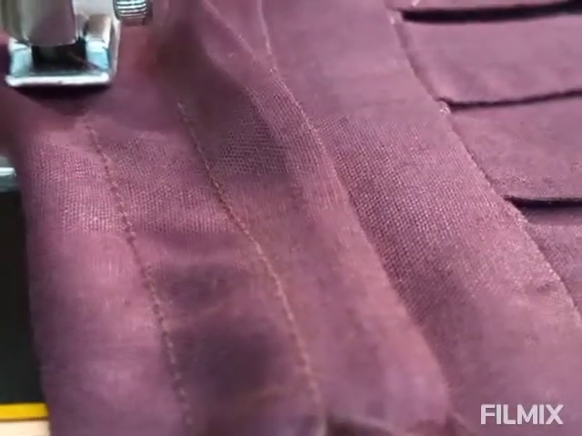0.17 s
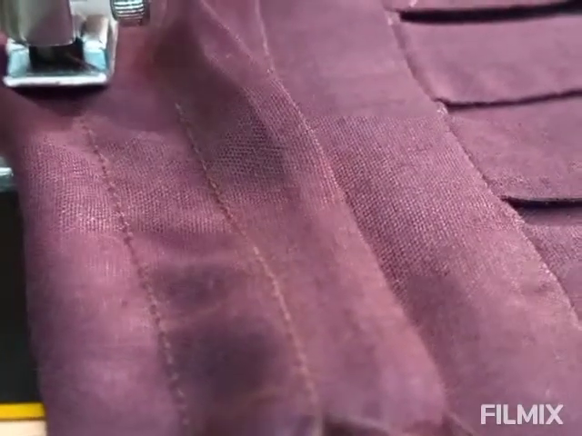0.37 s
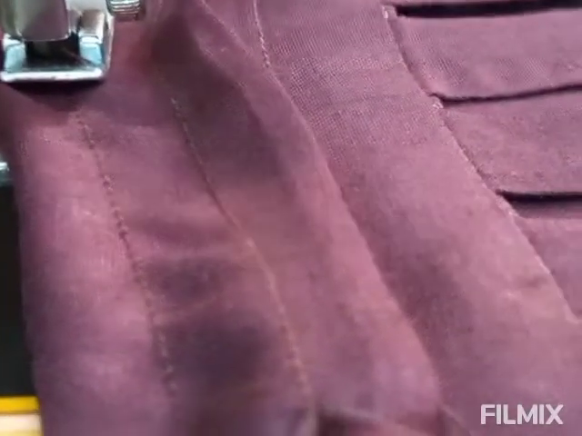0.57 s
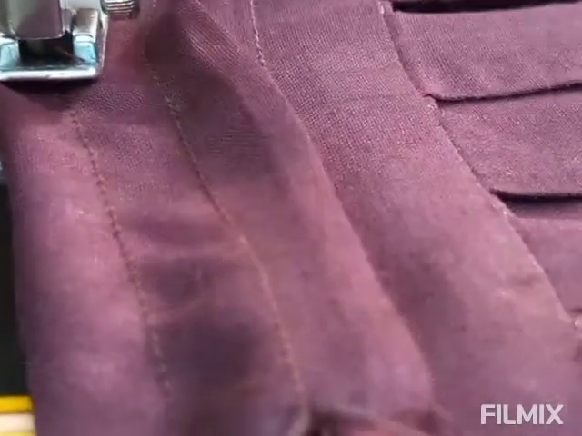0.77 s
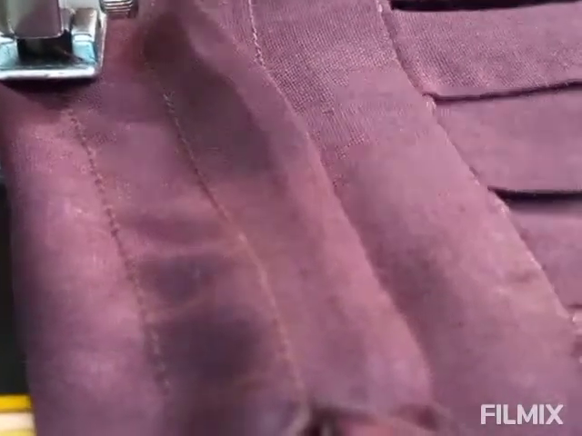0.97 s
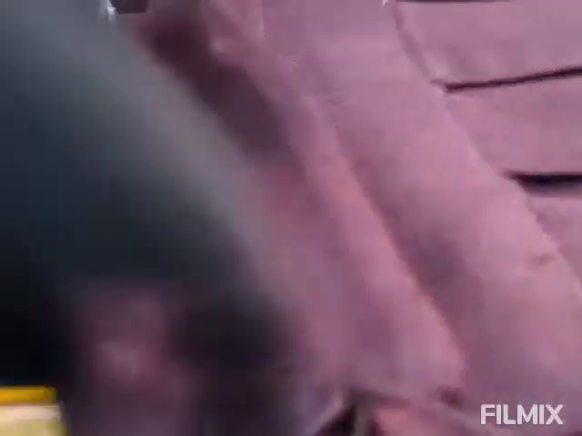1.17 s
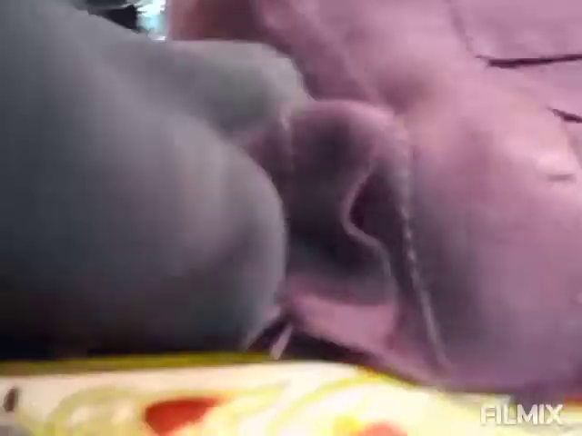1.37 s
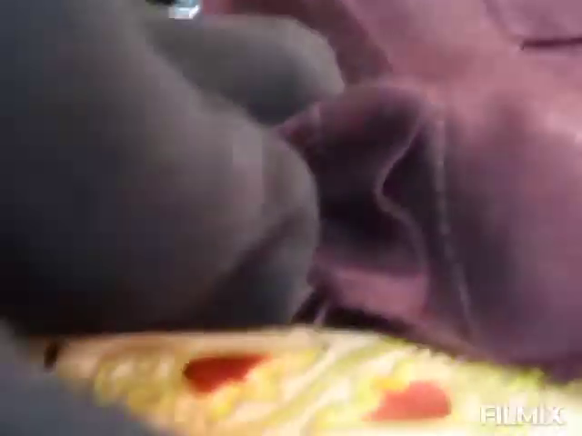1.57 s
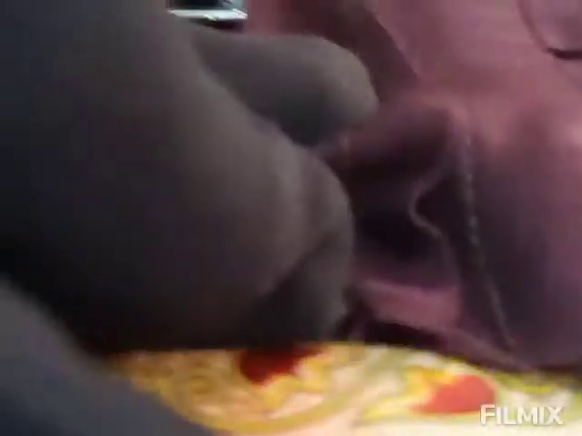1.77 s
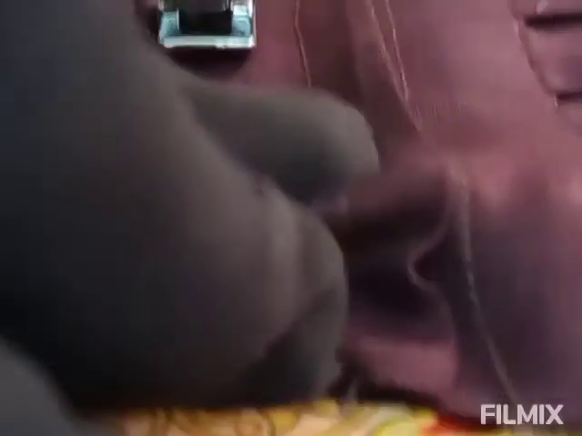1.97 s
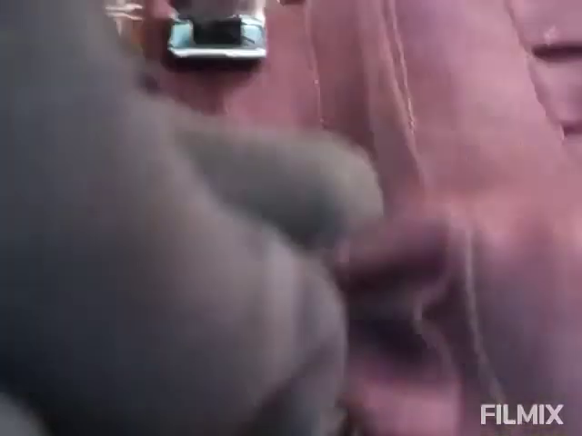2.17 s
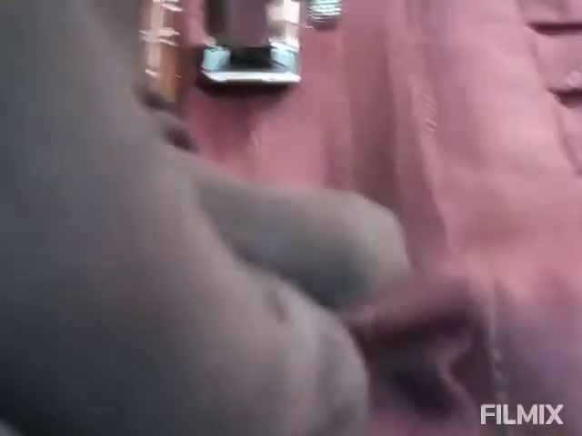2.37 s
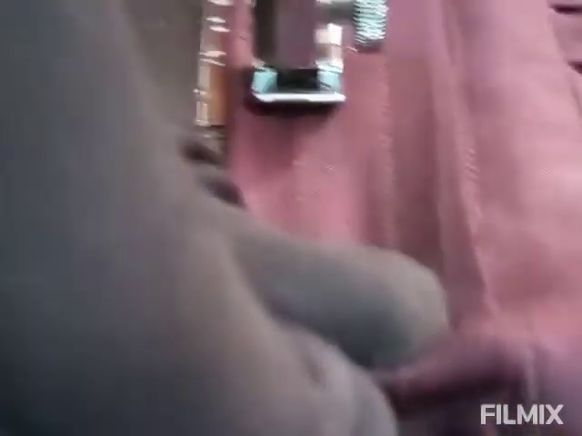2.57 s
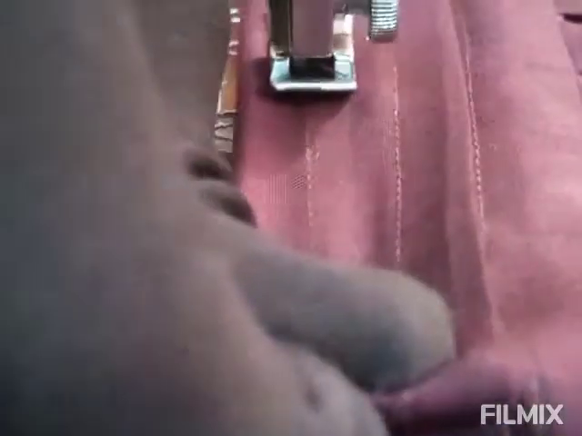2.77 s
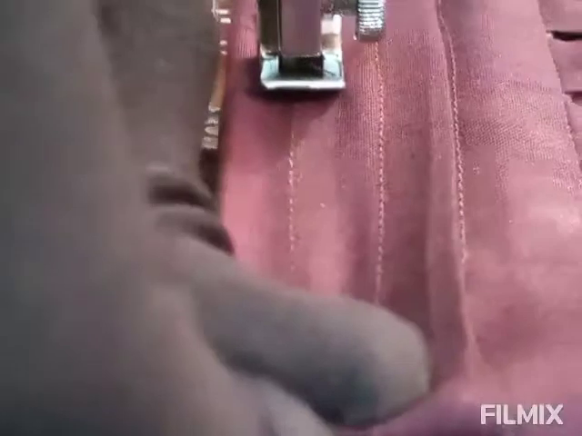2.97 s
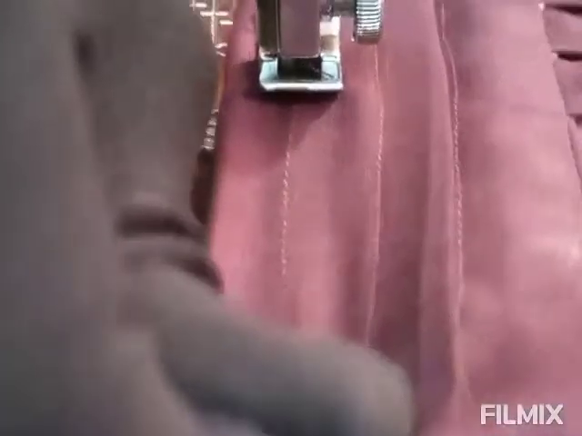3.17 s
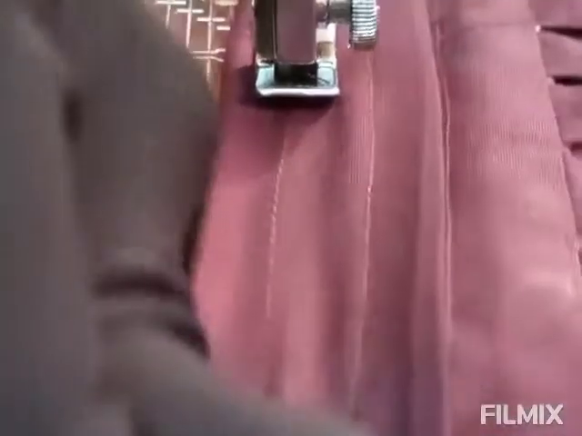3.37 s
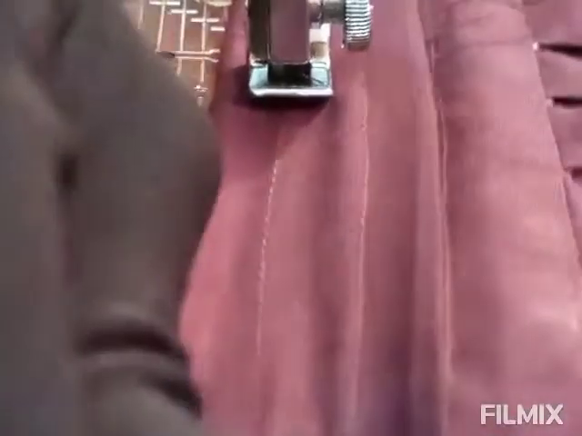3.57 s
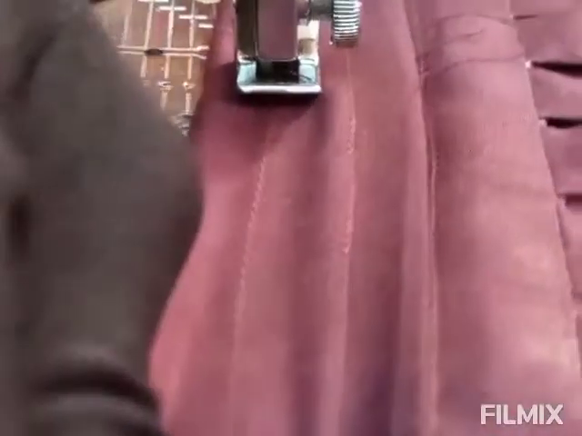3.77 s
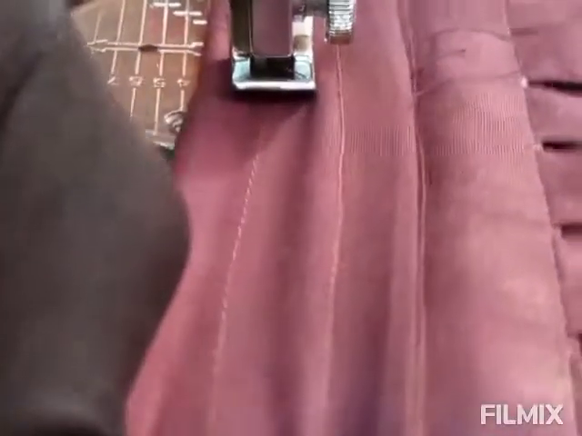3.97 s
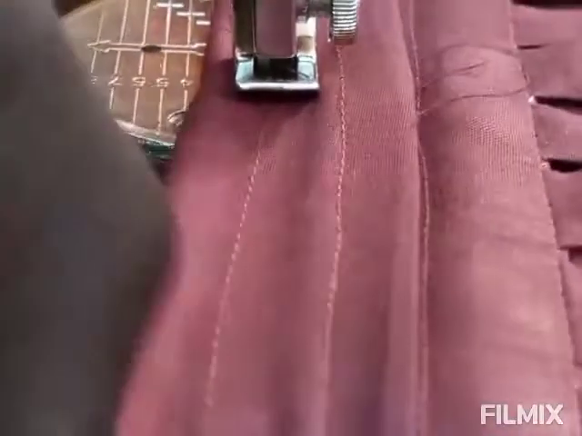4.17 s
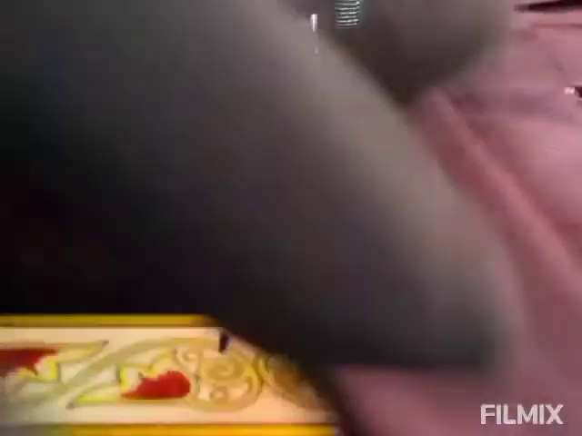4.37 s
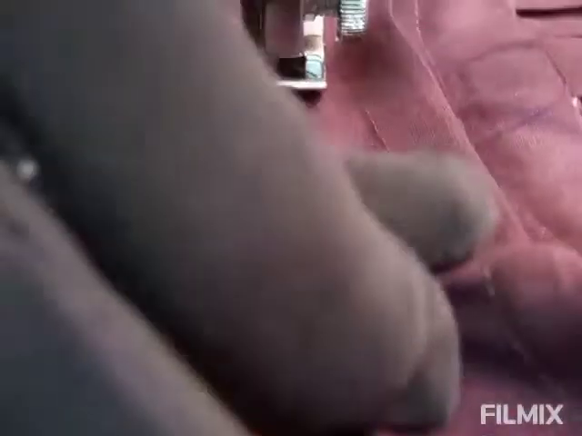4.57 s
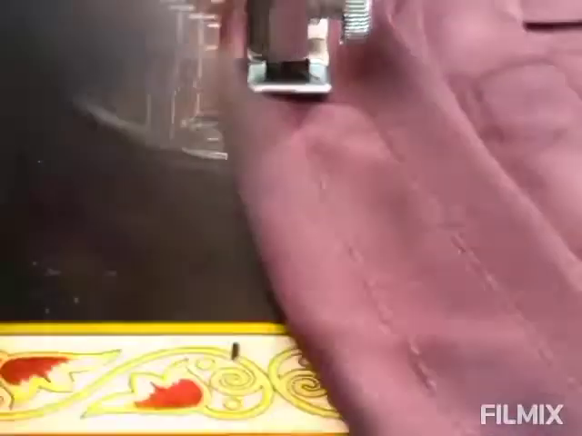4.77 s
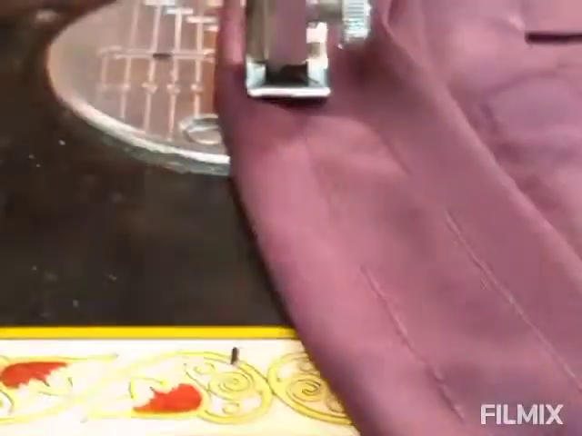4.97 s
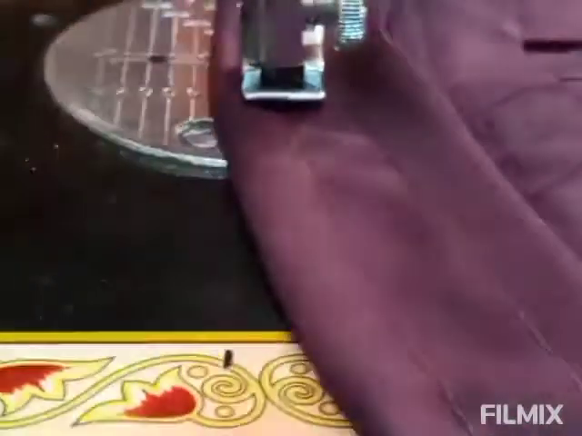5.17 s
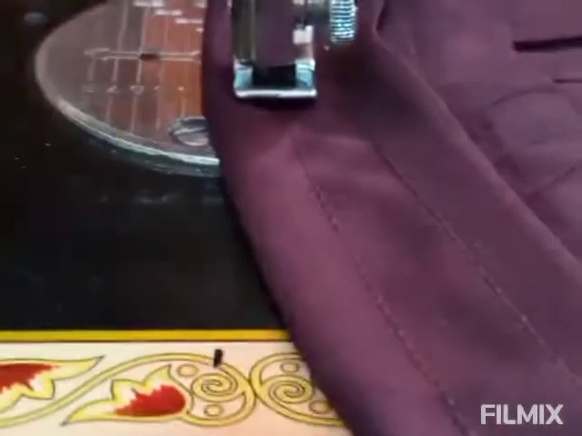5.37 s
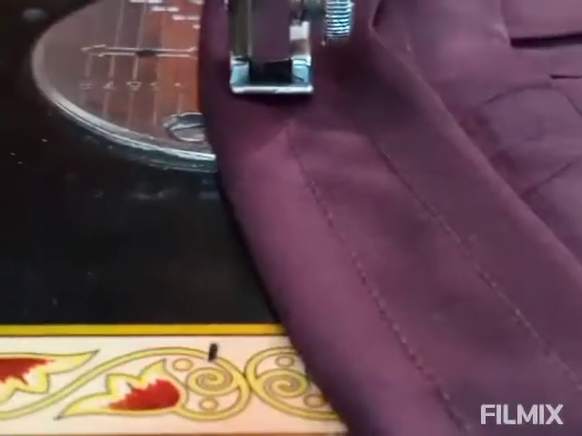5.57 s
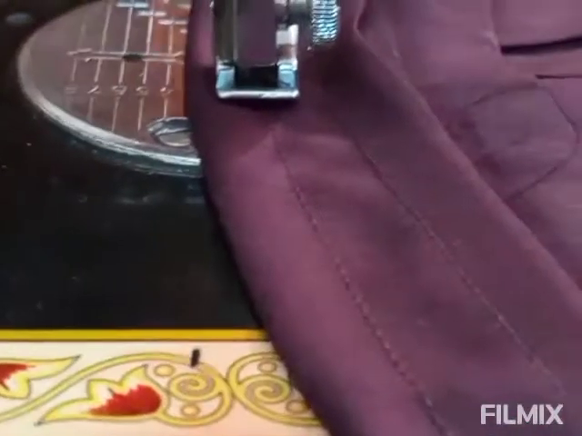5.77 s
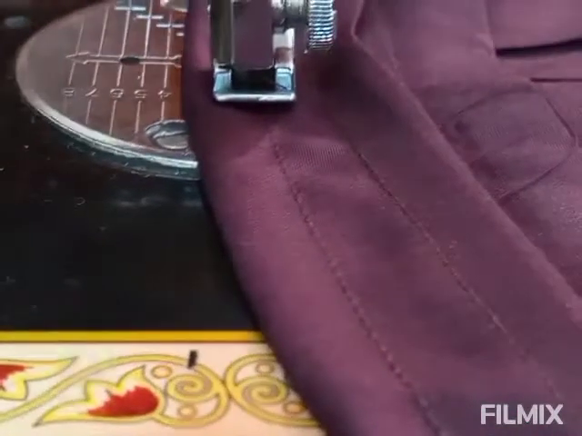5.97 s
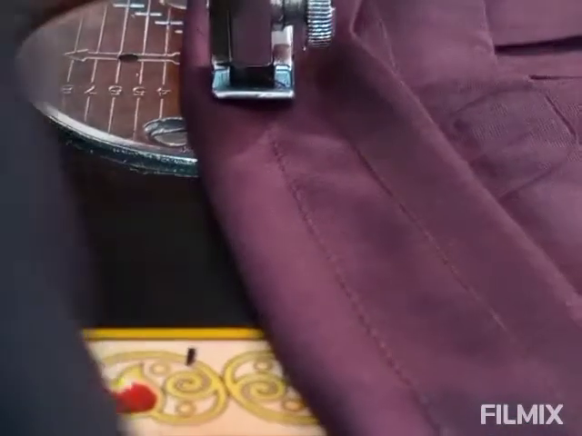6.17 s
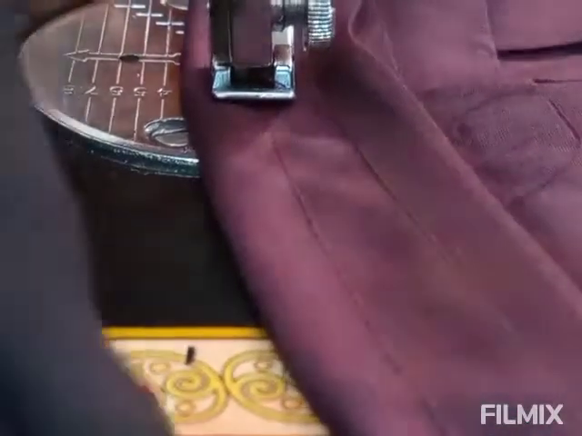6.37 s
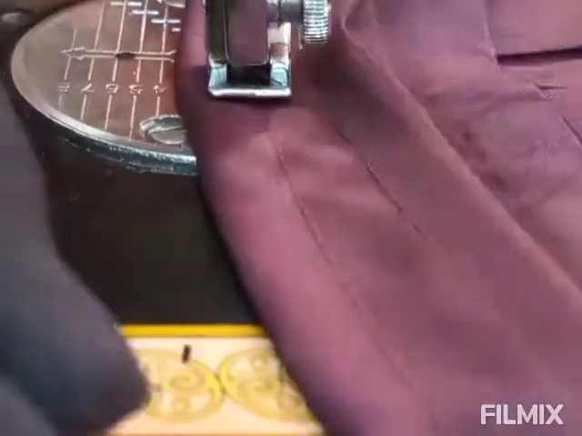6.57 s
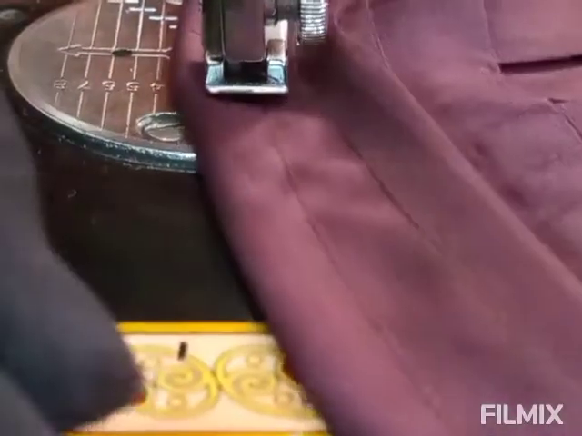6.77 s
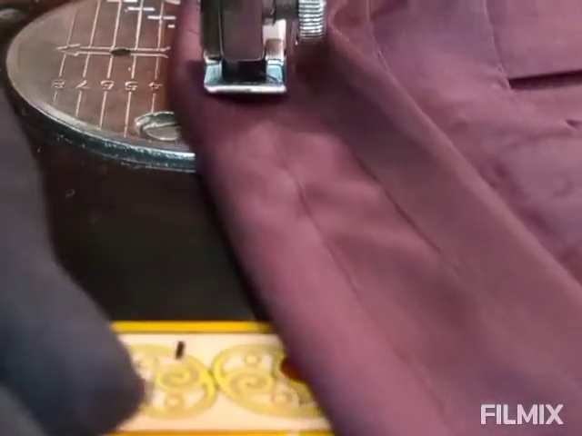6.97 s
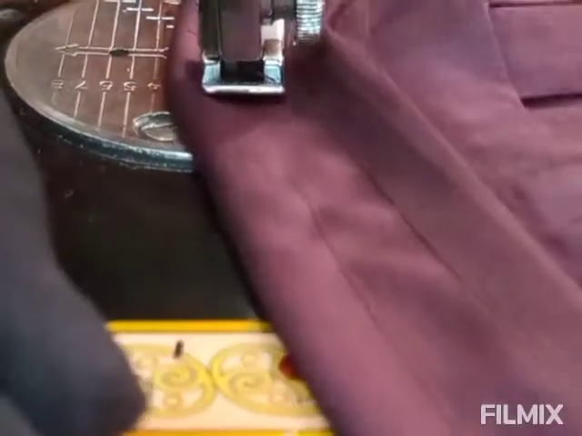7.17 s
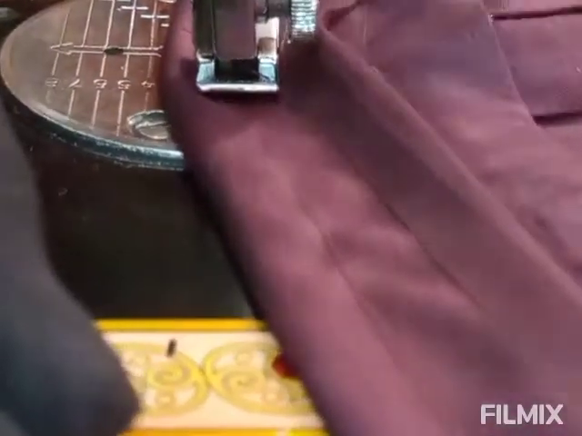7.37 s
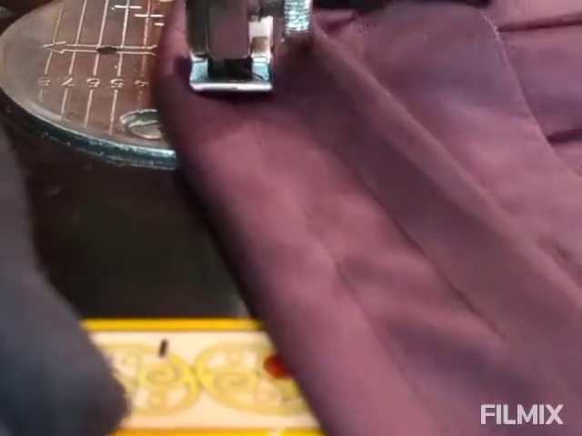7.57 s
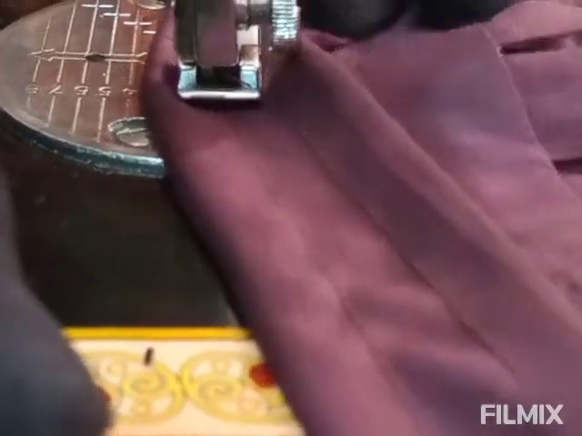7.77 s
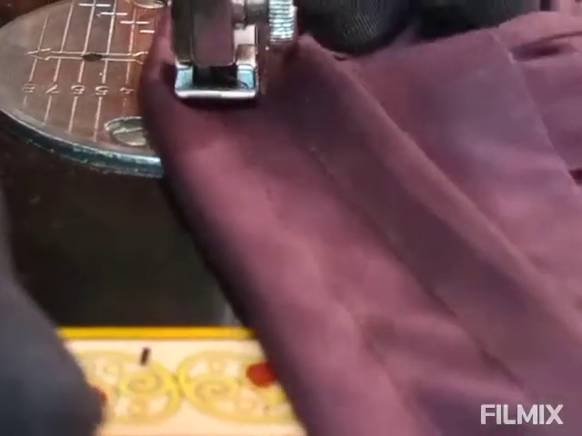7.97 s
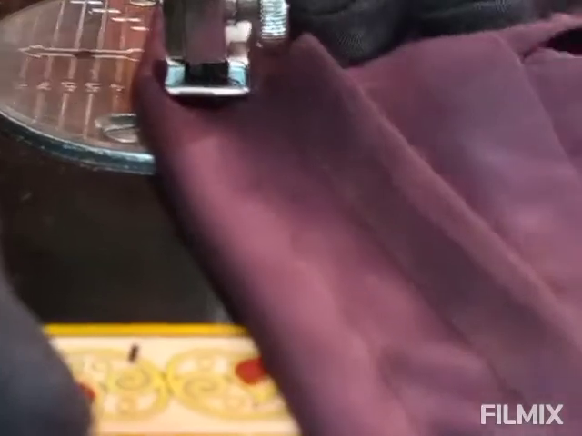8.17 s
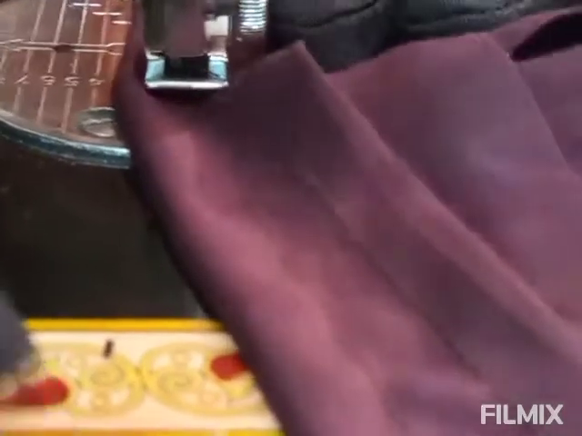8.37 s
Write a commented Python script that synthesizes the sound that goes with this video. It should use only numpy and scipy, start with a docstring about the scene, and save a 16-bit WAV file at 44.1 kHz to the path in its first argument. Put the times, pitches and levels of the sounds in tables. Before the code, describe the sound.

A sewing machine close up: quiet room, then a hissing motor start, a fast metallic clattering run, a slowing stop, and a second fast run.

```python
"""A small room murmurs with steady air noise and a low hum; the microphone stands close to a sewing machine.
The pedal goes down: motor and slipping belt hiss in grains, the drive knocks softly, a rubbing part sings.
A fast run follows: two shuttle swings a stitch, each a dull linkage knock, a light tick and a bright steel
clack of ringing noise, over rattle and table rumble. It slows to a rest with a thin rising whistle, then the
pedal starts a second fast run that lasts to the end."""
import sys
import numpy as np
from scipy import signal
from scipy.io import wavfile
from scipy.ndimage import uniform_filter1d

SR = 44100
rng = np.random.default_rng(int(sys.argv[2]) if len(sys.argv) > 2 else 0)


def write(x):
    x = np.atleast_2d(x).T
    wavfile.write(sys.argv[1], SR, np.round(np.clip(x, -1, 1) * 32767).astype(np.int16))


N = 371322
TIME = np.arange(N) / SR
HZ = np.fft.rfftfreq(8192, 1 / SR)


def amp(db):
    """Decibels to gain."""
    return 10 ** (np.asarray(db) / 20)


def unit(x):
    """Scales to rms 1."""
    return x / np.sqrt(np.mean(x ** 2) + 1e-20)


def read(points, hz):
    """Reads a spectrum on a log-frequency axis."""
    f, value = np.transpose(points)
    return np.interp(np.log(hz + 1), np.log(f + 1), value)


def level(curve):
    """Gain over time from points of (time [s], level [dB]), silent outside them."""
    s, db = np.transpose(curve)
    return np.interp(TIME, s, amp(db), 0, 0)


def ringing(modes):
    """Gain over frequency of a set of resonances, summed in power."""
    power = sum(amp(db) ** 2 / (1 + (2 * (HZ - hz) / width) ** 2) for hz, width, db in modes)
    return np.sqrt(power)


def colour(x, gain):
    """Causal minimum-phase filter of energy 1: resonances ring after each blow."""
    log_gain = np.log(np.maximum(gain / gain.max(), 1e-5))
    circle = np.concatenate([log_gain, log_gain[-2:0:-1]])
    spectrum = np.exp(np.conj(signal.hilbert(circle)))
    response = np.fft.ifft(spectrum).real[:len(HZ)]
    return signal.oaconvolve(x, response / np.linalg.norm(response))[:N]


def grit(per_s, spread_db):
    """Tiny impacts of random size, sign and time, rms 1."""
    size = amp(spread_db * np.minimum(rng.exponential(1, N), 4))
    sign = rng.choice([-1, 1], N)
    struck = rng.random(N) < per_s / SR
    return unit(size * sign * struck)


def pulses(times, gains):
    """Single clean impacts, alike but for their gain; at gain 1 each has rms 1 over 5 ms."""
    hits = np.zeros(N)
    at = np.clip(np.round(times * SR).astype(int), 0, N - 1)
    np.add.at(hits, at, gains * np.sqrt(.005 * SR))
    return hits


def blows(times, gains, rise, decay, abrupt=1):
    """Envelope of contacts that build up in rise [s] and chatter out in decay [s], more suddenly if abrupt."""
    hits = pulses(times, gains) ** 2
    t = TIME[:len(HZ)]
    power = ((1 - np.exp(-t / rise)) * np.exp(-(t / decay) ** abrupt)) ** 2
    power /= power.sum()
    return np.sqrt(np.maximum(signal.oaconvolve(hits, power)[:N], 0))


def fuzzy_tone(hz, width_hz):
    """A narrow line that wavers in level and phase, rms 1."""
    r = np.exp(-np.pi * width_hz / SR)
    noise = rng.standard_normal(N) + 1j * rng.standard_normal(N)
    fuzz = signal.lfilter([1], np.poly([r, r]), noise)
    carrier = np.exp(2j * np.pi * np.cumsum(hz * np.ones(N)) / SR)
    return unit((fuzz * carrier).real)


# Spectrum of the air in the room: (frequency [Hz], relative density [dB per Hz])
AIR_SPECTRUM = [(20, -35), (45, -29), (85, -12), (190, -6.5), (390, -13), (650, -7), (900, -12.5),
                (1250, -13), (2500, -20), (4200, -23.5), (6400, -25.5), (8000, -33), (9800, -31.5),
                (12000, -43.5), (15200, -44)]


def air():
    """Steady air noise, as from a fan, with a few hollow resonances and a slight sway in level."""
    # (frequency [Hz], width [Hz], relative level [dB]), before squaring
    hollows = [(135, 14.6, 0.0), (194.3, 17, 0.5), (521, 43, -1.0), (680.6, 49, 4.0)]
    sway_db = 0.5 * unit(uniform_filter1d(rng.standard_normal(N), size=4000))
    wash = amp(-46) * colour(rng.standard_normal(N), amp(read(AIR_SPECTRUM, HZ)))
    drone = amp(-52.5) * colour(rng.standard_normal(N), ringing(hollows) ** 2)
    return (wash + drone) * amp(sway_db)


def hum():
    """A low line whose level and phase waver."""
    return amp(-60) * fuzzy_tone(89.3, width_hz=29)


# Presses of the pedal: (time [s], belt slip length [s], release time [s], slipping hiss level [dB],
# running hiss level [dB]); the second release lies beyond the end
PEDAL_PRESSES = [(1.89, 0.4, 5.8, -28.5, -68), (6.517, 0.36, 9.5, -27.5, -40)]


def pedal(attack_s, steepness):
    """Gain of the motor: it swells, stays loud while the belt slips, sinks once the machine has caught up."""
    slip_fade_s, release_s = 0.08, 0.025
    gain = np.zeros(N)
    for start, slip_s, release, slip_db, run_db in PEDAL_PRESSES:
        attack = np.clip((TIME - start) / attack_s, 0, 1) ** steepness
        slip = np.exp(-np.maximum(TIME - start - slip_s, 0) / slip_fade_s)
        held = np.exp(-np.maximum(TIME - release, 0) / release_s)
        gain += attack * held * (slip * amp(slip_db) + (1 - slip) * amp(run_db))
    return gain


# Spectrum of the motor hiss: (frequency [Hz], relative density [dB per Hz])
HISS_SPECTRUM = [(300, -17), (1500, -13.5), (2100, -17.5), (2550, -8), (3200, -30), (4050, -10.5),
                 (5000, -18.5), (7300, -4), (8000, -4), (8900, 4), (10300, -13), (12400, -36), (15200, -10)]


def motor():
    """Brushes and slipping belt hiss in grains, dull, then bright; it eases after each clack as load drops."""
    flutter_db = 1.9 * unit(uniform_filter1d(rng.standard_normal(N), size=260))
    ease_db = -4 * np.exp(-((cycle() % 1 - .2) / 0.051) ** 2)
    grains = grit(per_s=4500, spread_db=1.6) * amp(flutter_db + ease_db)
    hiss = amp(read(HISS_SPECTRUM, HZ))
    bright = colour(grains * pedal(attack_s=0.095, steepness=4.1), hiss)
    early_grains = grit(per_s=2500, spread_db=3.5) * pedal(attack_s=0.07, steepness=1.1)
    dull = colour(early_grains, hiss / np.hypot(1, (HZ / 4500) ** 2))
    return bright + amp(-17.5) * dull


# Ringing of needle bar, plate and shuttle: (frequency [Hz], width [Hz], relative level [dB]), before sharpening
STEEL_MODES = [(4470, 170, -10), (5700, 380, -6.5), (6320, 670, -3), (6570, 220, 1), (7010, 270, -3.5),
               (7770, 216, 3), (8020, 220, -2), (8500, 86, 1.5), (8850, 280, -1), (9400, 190, 4.5),
               (10170, 670, -3), (11340, 340, -5), (13200, 160, 1.5), (15100, 500, -10), (15300, 500, -11)]
# Broad colour of the steel: (frequency [Hz], relative level [dB])
STEEL_TILT = [(100, -31), (2000, -1), (4000, 2), (5500, -1), (12000, -2), (16000, -3.5)]


def steel(sharpness=1.26):
    """Gain of the steel parts; a higher sharpness makes the resonances stand out more."""
    return ringing(STEEL_MODES) ** sharpness * amp(read(STEEL_TILT, HZ))


def light_steel():
    """Gain of the steel under light contacts, which are shorter, so brighter."""
    return steel() * HZ / (HZ + 12000)


# Single ticks of loose steel parts: (time [s], level [dB])
LOOSE_TICKS = [(1.896, -51), (5.271, -27), (5.312, -24), (5.565, -34), (5.708, -28.5), (6.604, -35),
               (6.763, -32)]


def loose_ticks():
    """Loose steel parts tick one by one, each a short light burst of noise in the steel."""
    s, db = np.transpose(LOOSE_TICKS)
    envelope = blows(s, amp(db), rise=.0006, decay=0.0056)
    return colour(envelope * rng.standard_normal(N), light_steel())


# Soft knocks as the drive engages: (time [s], level [dB])
DRIVE_KNOCKS = [(1.933, -32.5), (6.545, -36.5), (6.622, -55)]
# A rubbing part sings while the shaft turns slowly: (middle time [s], length [s], level [dB before stutter trim])
RUBBING_SQUEAKS = [(2.044, 0.15, -47), (2.25, 0.18, -39.5), (6.706, 0.17, -42), (6.914, 0.019, -32),
                   (7.027, .025, -35)]


def take_up():
    """The drive engages with soft knocks in the cast body, and a rubbing part sings a rough rising note."""
    s, db = np.transpose(DRIVE_KNOCKS)
    knocks = blows(s, amp(db), rise=0.005, decay=0.027) * rng.standard_normal(N)
    sing = sum(amp(db) / (1 + ((TIME - middle) / (length / 2)) ** 8) for middle, length, db in RUBBING_SQUEAKS)
    stutter_db = 2.5 * unit(uniform_filter1d(rng.standard_normal(N), size=400)) - 1.5
    # the note climbs to its pitch after each press of the pedal
    flat = sum((TIME >= start) * np.exp(-abs(TIME - start) / 0.085) for start, *_ in PEDAL_PRESSES)
    note = fuzzy_tone(4525 - 450 * flat, width_hz=330)
    return colour(knocks, ringing(BODY_MODES) ** .5) + note * sing * amp(stutter_db)


FULL_SPEED = 15  # stitches per s
# Speed of the shaft, one list a run: (time [s], speed [stitches per s])
SHAFT_SPEED = [
    [(2.05, 5.73), (2.24, 6.66), (2.38, 9.75), (2.61, 13.1), (2.76, 12.71), (3.22, 15.58), (3.5, 13.15),
     (3.76, 11.28), (3.85, 13.77), (4.19, 15.2), (4.48, 15.99), (4.89, 12.58), (5.3, 9.71), (5.57, 7.88),
     (5.75, 4.98), (5.885, 0)],
    [(6.68, 8.63), (6.86, 6.28), (6.99, 9.75), (7.16, 12.84), (7.43, 16.21), (7.5, 14.86), (7.65, 15.91),
     (7.97, 16.37), (8.43, 11.94)],
]


def shaft():
    """Speed of the shaft over time, and a gate that opens as each run gets going."""
    take_up_s = 0.13
    speed = sum(np.interp(TIME, *np.transpose(run), 0, 0) for run in SHAFT_SPEED)
    gate = np.zeros(N)
    for run in SHAFT_SPEED:
        start, end = run[0][0], run[-1][0]
        gate += np.clip((TIME - start) / take_up_s, 0, 1) ** 2 * (TIME < end)
    return speed, gate


def half_turns(run):
    """Half turns of the shaft since the start of a run: the integral of its speed."""
    return 2 * np.cumsum(np.interp(TIME, *np.transpose(run), 0, 0)) / SR


def cycle():
    """Place in the stitch, in swings: 0 at the backward clack, 1 at the forward clack, up to 2."""
    place = np.zeros(N)
    for run in SHAFT_SPEED:
        place = np.where(TIME >= run[0][0], half_turns(run), place)
    return (place - 1) % 2


def with_speed(db, power, stall):
    """Gain of a noise: about db at full speed, growing with speed, dying below stall [stitches per s]."""
    speed, gate = shaft()
    return gate * amp(db) * (speed / FULL_SPEED) ** power * speed ** 4 / (speed ** 4 + stall ** 4)


# The two swings of a stitch, backward then forward, before force and spread:
# (clack level [dB], leading tick level [dB], linkage knock level [dB], plate ring level [dB])
SWING_LEVELS = [(-23.5, -39, -31.5, -47), (-23.5, -21, -35, -31.5)]
# How hard the steel parts strike: (time [s], added level [dB])
STRIKING_FORCE = [(2.21, -15), (2.65, -3), (3.12, 2.5), (3.65, 0), (4.02, 0.5), (4.5, 0), (5.1, 3),
                  (6.74, -16), (6.95, -1), (7.55, 0.5), (7.72, -2), (7.92, 1), (8.17, -3), (8.42, -4)]
# Slow or hard swings heard one by one: (time [s], clack level [dB], leading tick level [dB], plate ring level [dB])
SINGLE_STROKES = [(2.1338, -28, -37.0, -47), (2.288, -27, -38, -34.0), (2.345, -25.0, -26.0, -28),
                  (2.397, -20, -44, -38.0), (2.443, -19.5, -33.0, -36), (2.491, -23.0, -40.0, -40),
                  (2.5333, -21.0, -25.0, -29), (2.573, -24.0, -27.0, -38.0), (2.6126, -23.5, -27.0, -30.0),
                  (2.6508, -23, -31.0, -34.0), (2.6877, -21.0, -24.0, -27), (2.7294, -23.5, -33.0, -40),
                  (2.768, -21, -24, -40), (2.8446, -18.5, -27.0, -31), (2.916, -19.5, -26, -35),
                  (2.9909, -25, -19, -39), (3.1288, -20, -18, -31.0), (3.193, -21, -21.0, -31.0),
                  (3.2583, -21, -22, -28.0), (3.2911, -21, -37.0, -38.0), (3.3256, -19.5, -26.0, -30),
                  (3.4686, -21, -25.0, -33), (3.5442, -21.5, -22.0, -26), (3.624, -22.5, -25.0, -30),
                  (3.6663, -23, -39.0, -38.0), (3.7526, -23, -35.0, -38.0), (3.7944, -21.5, -27.0, -31.0),
                  (3.8352, -22, -39.0, -38.0), (3.9411, -20.5, -24, -24), (3.9768, -23, -36.0, -38.0),
                  (4.011, -20, -19, -33), (4.0478, -19.5, -32.0, -32.0), (4.278, -21, -23.0, -37.0),
                  (4.3115, -23, -36.0, -33.0), (4.3451, -21, -23, -38.0), (4.5981, -20, -23, -35.0),
                  (4.6656, -22.5, -25, -32.0), (4.811, -19, -26, -31), (4.849, -21.5, -30.0, -38.0),
                  (4.8898, -22, -23, -40), (4.929, -21, -40.0, -33.0), (4.9688, -21, -23.0, -38),
                  (5.0105, -23.5, -41.0, -41), (5.054, -19, -32.0, -28), (5.098, -23.5, -39.0, -38.0),
                  (5.144, -19, -31.0, -26), (5.191, -22.5, -31, -34.0), (5.241, -22, -25, -29),
                  (5.289, -23, -32, -32), (5.3408, -23, -26.0, -22.5), (5.3972, -21.5, -42.0, -31),
                  (5.452, -20.5, -30.0, -20), (5.513, -24.5, -46.0, -42), (5.5737, -23, -31, -26),
                  (5.643, -22.5, -42.0, -36), (5.724, -35, -40.0, -28), (6.805, -31, -37.0, -27.5),
                  (6.884, -31.0, -35.0, -38.0), (6.9457, -21.5, -31.0, -25), (7.0, -24, -31, -38.0),
                  (7.0484, -21, -27.0, -29), (7.093, -24.5, -38.0, -37.0), (7.1344, -19.5, -21, -34),
                  (7.172, -23.5, -35.0, -38.0), (7.21, -19.5, -22, -33.0), (7.248, -22, -39.0, -44),
                  (7.411, -19.5, -32.0, -33.0), (7.514, -22, -39.0, -37.0), (7.5484, -23, -16.5, -38.0),
                  (7.5786, -26, -39.0, -38.0), (7.6106, -20, -19, -33.0), (7.64, -23, -34, -40),
                  (7.857, -20.5, -33.0, -35), (7.891, -20, -29, -34.0), (7.9209, -20, -24.0, -32.0),
                  (7.9507, -21, -32, -38.0), (8.0452, -19.5, -23.0, -38.0), (8.215, -26, -39.0, -33.0),
                  (8.249, -22.0, -25.0, -36.0), (8.2857, -22.5, -39.0, -36.0), (8.3231, -22, -22, -31.0),
                  (8.362, -22, -32, -34.0), (8.4026, -21.5, -22, -40)]


def swings():
    """One swing each half turn: time, length [s], direction (1 = forward), clack, tick, knock, plate [dB]."""
    times, kinds = [], []
    for run in SHAFT_SPEED:
        at = np.flatnonzero(np.diff(np.floor(half_turns(run))))
        times.extend(TIME[at])
        kinds.extend(np.arange(len(at)) % 2)
    s = np.array(times)
    db = np.array(SWING_LEVELS)[kinds] + np.interp(s, *np.transpose(STRIKING_FORCE))[:, None]
    spread_db = [1.1, 2.5, 1.5, 1.5]  # clack, tick, knock, plate
    db = db + rng.standard_normal(db.shape).clip(-2, 2) * spread_db
    for at, *levels in SINGLE_STROKES:  # a swing that stands out has its own time and strength
        nearest = np.argmin(abs(s - at))
        s[nearest] = at
        db[nearest, [0, 1, 3]] = levels
    length = .5 / np.interp(s, TIME, shaft()[0])
    return s, length, np.array(kinds), *db.T


# Linkage knocks heard one by one: (time [s], level [dB], before the mix of thud and chatter)
CLEAR_KNOCKS = [(2.27, -28.5), (2.38, -29.5), (2.427, -34), (2.475, -30.5), (2.562, -26.5), (2.709, -29.5),
                (3.089, -27), (3.346, -29.5), (3.695, -28.0), (4.235, -30), (4.305, -28.5), (4.692, -27.0),
                (4.762, -30.5), (4.954, -26.5), (5.325, -28.5), (5.378, -31.5), (5.492, -29.0),
                (5.62, -30.5), (6.867, -29.5), (6.982, -33), (7.034, -36), (7.077, -35), (7.307, -28.5),
                (7.501, -32), (8.001, -27), (8.2, -33)]
# Ringing of the cast body under the linkage: (frequency [Hz], width [Hz], relative level [dB]), before sharpening
BODY_MODES = [(595, 63, -2), (700, 60, -24.5), (962, 170, -1), (1270, 220, -7), (1503, 81, 2.5),
              (1800, 950, -4.5), (2230, 100, -4.5), (2960, 270, -27), (3410, 220, -2.5), (5200, 950, -2.5)]


def linkage(s, length, forward, knock_db):
    """The crank knocks the cast body before each clack, twice on the backward swing; bearings chatter."""
    clear_s, clear_db = np.transpose(CLEAR_KNOCKS)
    due = s - .002 - .3 * length
    # a clear knock replaces the ordinary one near it
    ordinary = abs(due[:, None] - clear_s).min(1) > .4 * length
    first = blows(due, ordinary * amp(knock_db), rise=0.002, decay=0.006)
    second_gain = (1 - forward) * amp(knock_db + 1)
    second = blows(s - .003 - .12 * length, second_gain, rise=0.0073, decay=0.013)
    clear = blows(clear_s - .002, amp(clear_db + 0.5), rise=0.0027, decay=0.01)
    knock = np.hypot(np.hypot(first, second) * with_speed(db=-2.5, power=0.22, stall=3), clear)
    thud = pulses(due + 0.002006, ordinary * amp(knock_db)) * with_speed(db=-2.5, power=.2, stall=3)
    thud = thud + pulses(clear_s + 0.002005, amp(clear_db))
    force = .7 * thud + .72 * knock * grit(per_s=9000, spread_db=1.8)

    # the bearings rest after each clack
    rest_db = 1 - 5 * np.exp(-((cycle() % 1 - .28) / .2) ** 2)
    bearings = with_speed(db=-37, power=0.87, stall=1.7) * amp(rest_db)
    strain = amp(-23) * pedal(attack_s=0.056, steepness=0.81)  # grinding of the loaded motor
    grind = np.hypot(bearings, strain) * grit(per_s=2200, spread_db=2.2)
    body = ringing(BODY_MODES)
    return colour(force, body ** 1.68) + colour(grind, body ** 0.76 / np.hypot(1, HZ / 5000))


def needle(s, length, forward, clack_db, tick_db):
    """Each swing: a light tick, the main clack and its rebound, and half a swing earlier a tap of the feed."""
    lag, phase = rng.standard_normal((len(s), 2)).T
    clack = blows(s - .0004, amp(clack_db + 2.3), rise=0.0002, decay=0.0034, abrupt=1.35)
    tick = blows(s - 0.142 * length - .001, amp(tick_db), rise=0.00037, decay=0.0016)
    rebound_gain = amp(clack_db - 11 + 1.7 * forward)
    rebound = blows(s + 0.005 + 0.00069 * lag, rebound_gain, rise=.0004, decay=0.0016)
    feed_s = s - length * (0.573 + 0.059 * phase)
    feed = blows(feed_s, amp(clack_db - 8.5), rise=0.00093, decay=0.0032)
    heavy = np.hypot(clack, rebound) * rng.standard_normal(N)
    light = np.hypot(tick, feed) * rng.standard_normal(N)
    return colour(heavy, steel()) + colour(light, light_steel())


# Ringing of the needle plate: (frequency [Hz], width [Hz], relative level [dB]), before sharpening
PLATE_MODES = [(4430, 130, -3), (5650, 300, -4.5), (6170, 200, -7.5)]


def plate(s, plate_db):
    """The needle plate rings at each swing, from one clean impact and a short chatter."""
    impact = pulses(s + 0.000991, amp(plate_db - 2.5))
    chatter = blows(s, amp(plate_db - 5), rise=.0004, decay=0.0043) * rng.standard_normal(N)
    return colour(impact + chatter, ringing(PLATE_MODES) ** 1.24)


def ping(s, forward, clack_db):
    """The shuttle pings on each forward swing: a clean impact on one resonance."""
    impact = pulses(s + 0.001502, forward * amp(clack_db - 10))
    return colour(impact, ringing([(5720, 300, 0)]) ** 1.5)


def shuttle(s):
    """The shuttle slides in its race, easing after each clack as it reverses; loose joints rattle with speed."""
    angle = np.interp(TIME, s, np.arange(len(s))) % 1
    rest_db = -6 * np.exp(-((angle - .28) / .13) ** 2)
    at = np.flatnonzero(rng.random(N) < 240 / SR) / SR
    joint_gain = amp(2.4 * rng.standard_normal(len(at)))  # spread in dB
    rattle = unit(blows(at, joint_gain, rise=0.0003, decay=0.0089))
    looseness = 0.67 * rattle * shaft()[0] / FULL_SPEED + 0.41
    sliding = grit(per_s=12000, spread_db=0.5) * with_speed(db=-28.5, power=0.5, stall=3.5)
    force = looseness * amp(rest_db) * sliding
    # colour of the softer contact: (frequency [Hz], relative level [dB])
    softer = [(3000, 14.5), (5000, 5.5), (6300, 5.5), (7700, -1), (9400, -1.5), (11000, 0.5), (15000, 4.0)]
    return colour(force, steel(sharpness=1) * amp(read(softer, HZ)))


# Main resonance of the wooden table: (frequency [Hz], width [Hz], relative level [dB])
WOOD_MAIN = (292, 85, -2)
# Further ringing of the wooden table: (frequency [Hz], width [Hz], relative level [dB])
WOOD_MODES = [(50, 63, -29), (124, 8.6, -5.5), (217, 33, -31), (365, 18, -4.5), (396, 32, -5),
              (477, 29, -4.5)]
# Shakes of the table in each stitch: (swings after the backward clack, width [swings], added level [dB])
TABLE_SHAKES = [(0.35, 0.18, 3.5), (1.89, 0.2, 5), (0.72, .12, 2)]
# Heavy bumps of the table: (time [s], deep push level [dB], ring of the wood level [dB])
TABLE_BUMPS = [(2.285, -36, -31), (3.2, -41, -45), (3.597, -55, -30), (3.791, -34, -40), (5.275, -57, -31),
               (5.3, -57, -33.5), (7.55, -37, -37), (8.01, -49, -32), (8.32, -36, -34)]


def table():
    """The machine shakes its wooden table unevenly, in time with the stitches, with a heavy bump at times."""
    place = cycle()
    shake_db = 0
    for at, width, db in TABLE_SHAKES:
        distance = (place - at + 1) % 2 - 1  # wraps round the stitch
        shake_db = shake_db + db * np.exp(-(distance / width) ** 2)
    shaking = grit(per_s=700, spread_db=2.0) * with_speed(db=-45.5, power=0.34, stall=6.6) * amp(shake_db)
    s, push_db, ring_db = np.transpose(TABLE_BUMPS)
    bump = blows(s, amp(ring_db), rise=0.0022, decay=0.0085) * rng.standard_normal(N)
    wood = ringing([WOOD_MAIN] + WOOD_MODES) * (HZ / np.hypot(HZ, 70)) ** 2 / np.hypot(1, HZ / 900)
    push = blows(s, amp(push_db), rise=0.0033, decay=0.0053) * rng.standard_normal(N)
    deep = ringing([(100, 240, 0)]) ** 2 * (HZ / np.hypot(HZ, 55)) ** 2
    return colour(shaking + bump, wood) + colour(push, deep)


# Thin whistle as the machine comes to rest: (time [s], level [dB])
REST_WHISTLE = [(5.72, -72), (5.82, -64), (6.05, -62), (6.3, -60), (6.45, -62), (6.56, -70)]


def whistle():
    """A thin line that glides up and levels off, with a faint haze around it."""
    top_hz, climb_hz, climb_s = 10170, 950, .37
    since = np.maximum(TIME - REST_WHISTLE[0][0], 0)
    hz = top_hz - climb_hz * np.exp(-since / climb_s)
    line = fuzzy_tone(hz, width_hz=70)
    haze = amp(-7) * fuzzy_tone(hz, width_hz=630)
    return (line + haze) * level(REST_WHISTLE)


# Decay of the small room: (frequency [Hz], time to fall by 60 dB [s])
ROOM_DECAY = [(200, 0.23), (1500, 0.13), (6000, 0.093), (15000, 0.05)]


def room(x):
    """Sparse reflections off the room, from 5 ms on, whose treble dies first."""
    t = TIME[:SR // 2]
    taps = rng.standard_normal(len(t)) * (rng.random(len(t)) < 3000 / SR) * (t > .005)
    hz, at, z = signal.stft(taps, SR, nperseg=256)
    decay = amp(-60 * at / read(ROOM_DECAY, hz)[:, None])
    tail = signal.istft(z * decay, SR, nperseg=256)[1]
    return signal.oaconvolve(x, tail / np.linalg.norm(tail))[:N]


def scene():
    """The machine close by with its faint room, the air, the hum and the whistle."""
    s, length, forward, clack_db, tick_db, knock_db, plate_db = swings()
    machine = motor() + loose_ticks() + take_up()
    machine += linkage(s, length, forward, knock_db)
    machine += needle(s, length, forward, clack_db, tick_db)
    machine += plate(s, plate_db) + ping(s, forward, clack_db)
    machine += shuttle(s) + table()
    return (air() + hum() + machine + amp(-13.5) * room(machine) + whistle())[None]


# Colour of the microphone port: (frequency [Hz], relative level [dB])
MICROPHONE_PORT = [(11500, -1), (12500, -3), (13100, -13), (14400, 2), (15000, 1)]


def record(dry, threshold_db=-25, recovery_db_per_s=170, squeeze=0.18, ceiling_db=-4):
    """Microphone colour, gentle levelling of loud strikes with steady recovery, soft overload, band limit."""
    x = colour(dry[0], amp(read(MICROPHONE_PORT, HZ)))
    power = signal.lfilter([1 / 100], [1, -99 / 100], x ** 2)  # smoothed over about 100 samples
    power_db = 10 * np.log10(power + 1e-12)
    # the reduction rises at once and recovers at a steady rate
    fall = TIME * recovery_db_per_s
    peak_db = np.maximum.accumulate(squeeze * (power_db - threshold_db) + fall)
    over_db = np.maximum(peak_db - fall, 0)
    x = amp(ceiling_db) * np.tanh(x * amp(-over_db - ceiling_db))
    low_pass = signal.firwin(401, 15900, window=("kaiser", 8), fs=SR)
    return signal.oaconvolve(x, low_pass, "same")[None]


dry = scene()
out = record(dry)
write(out)
```